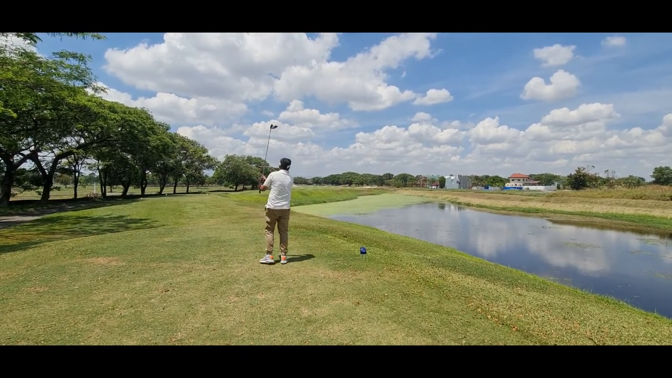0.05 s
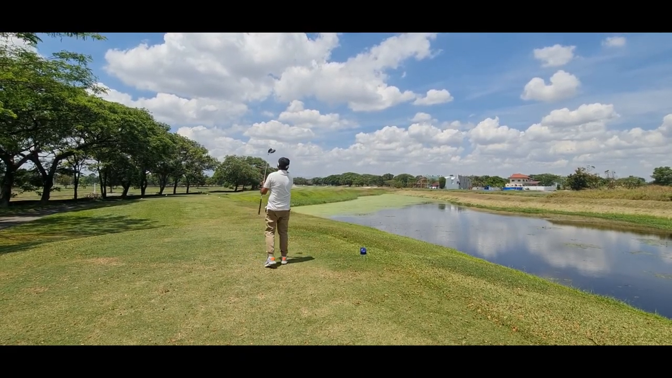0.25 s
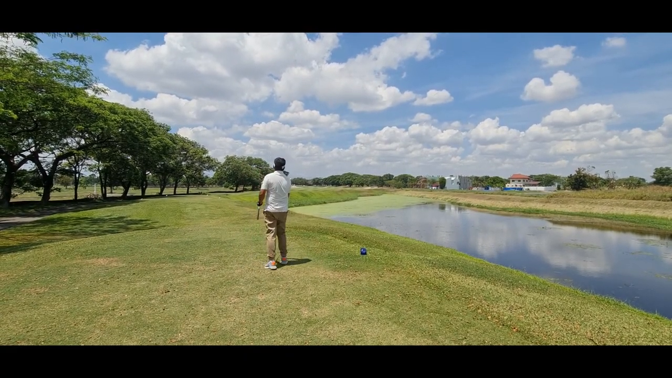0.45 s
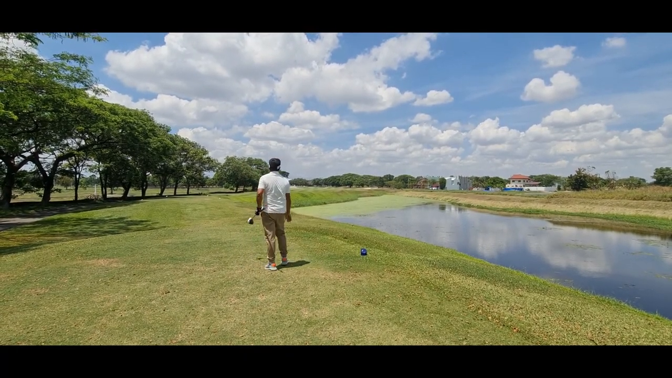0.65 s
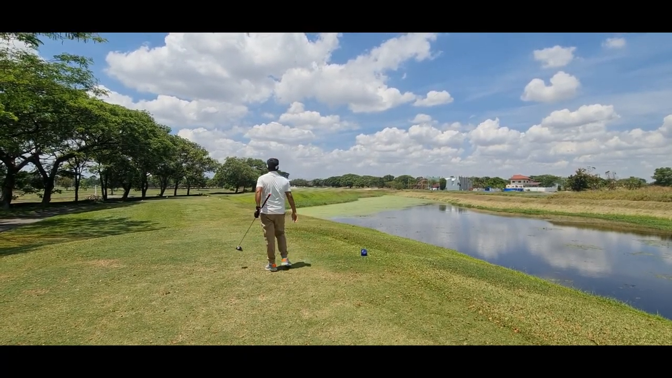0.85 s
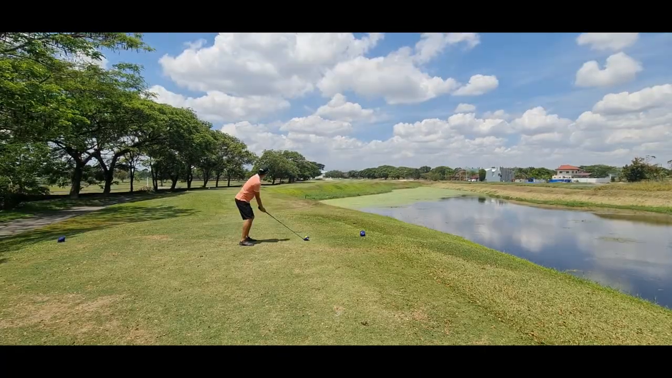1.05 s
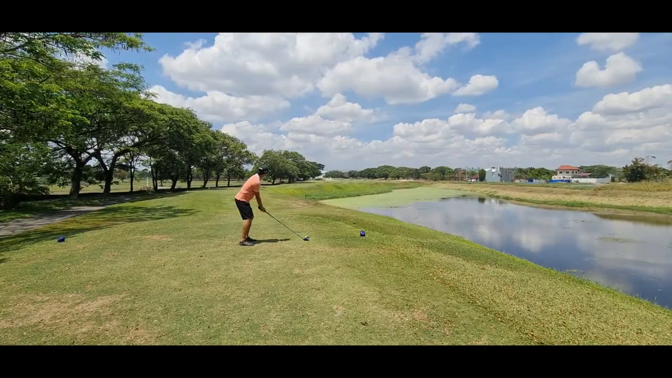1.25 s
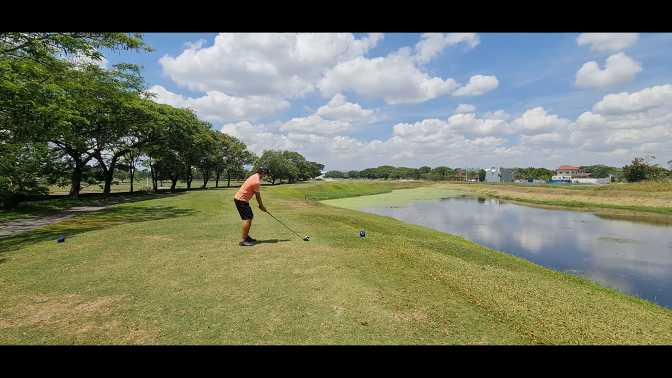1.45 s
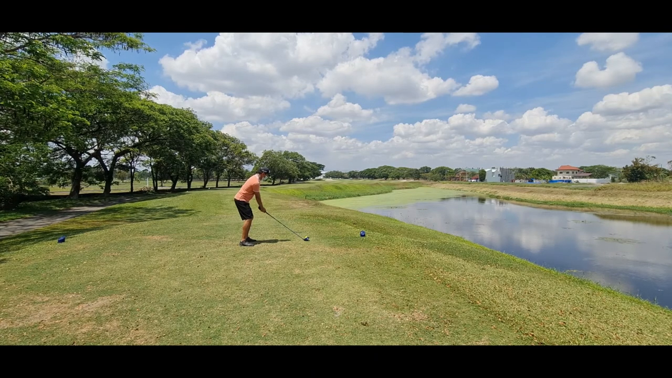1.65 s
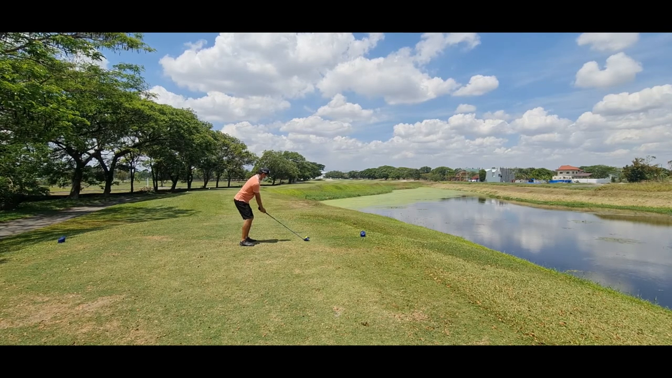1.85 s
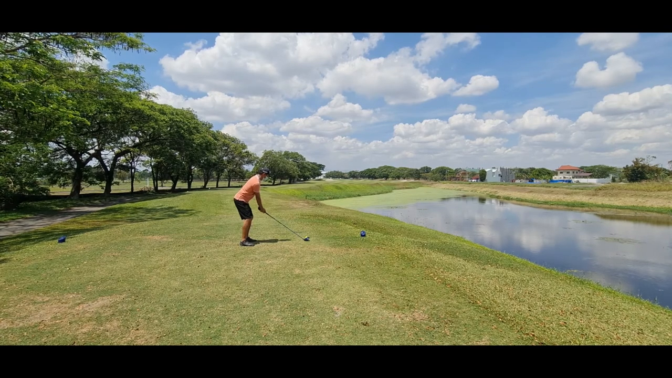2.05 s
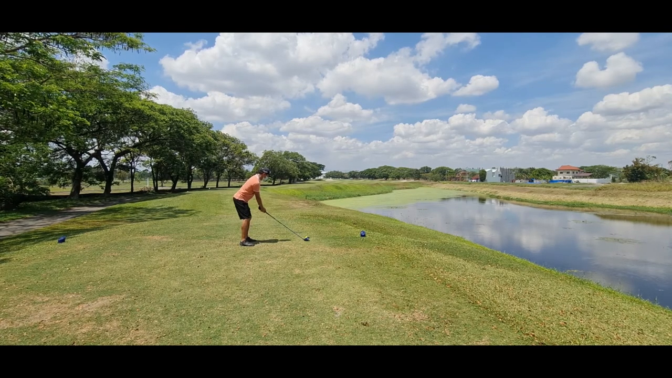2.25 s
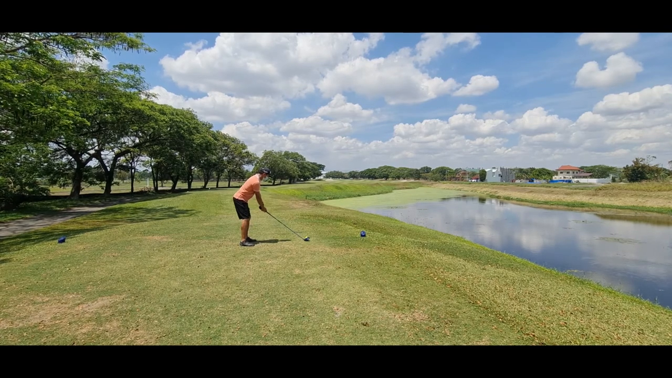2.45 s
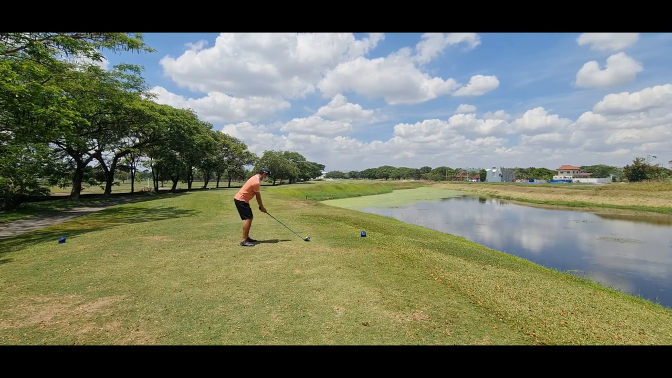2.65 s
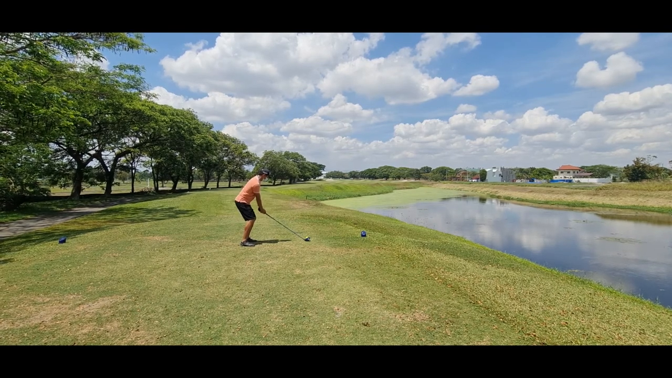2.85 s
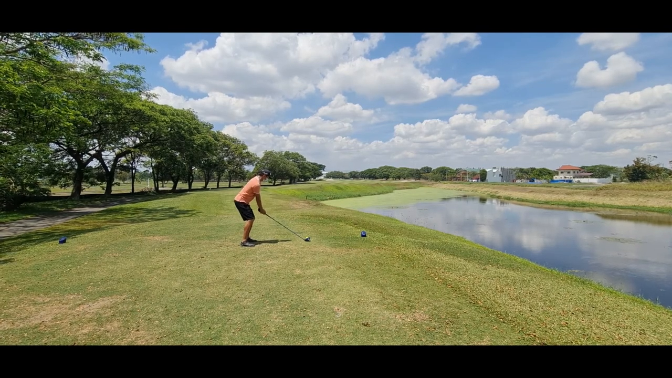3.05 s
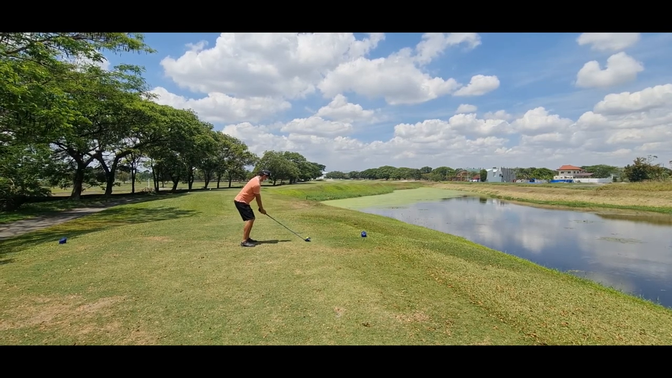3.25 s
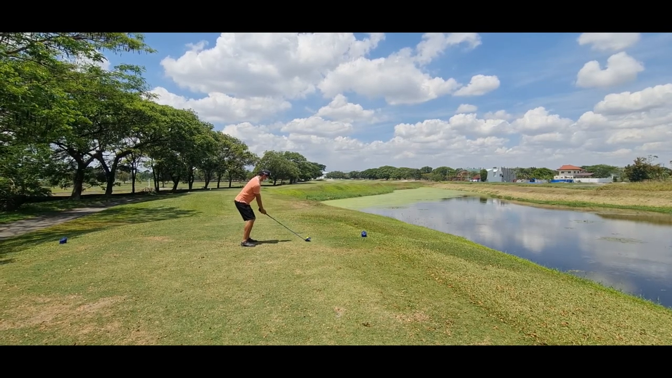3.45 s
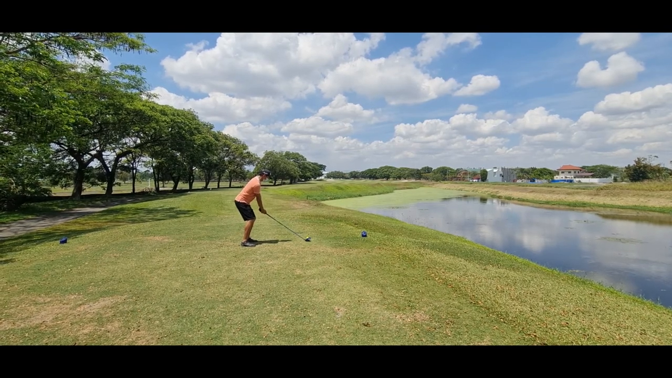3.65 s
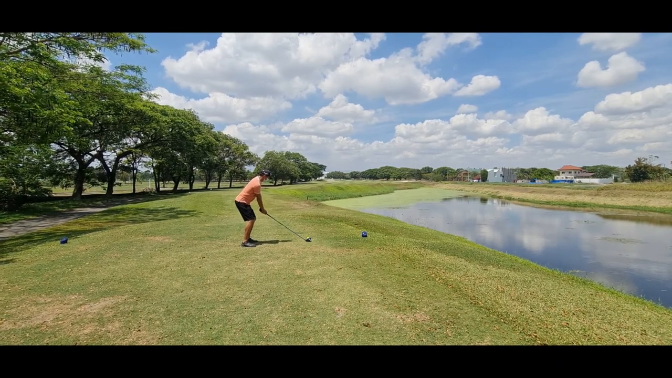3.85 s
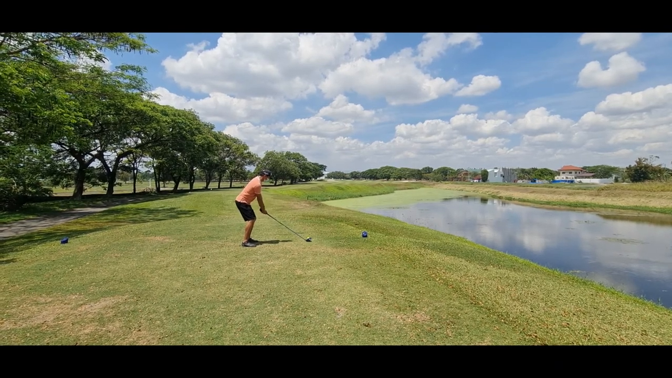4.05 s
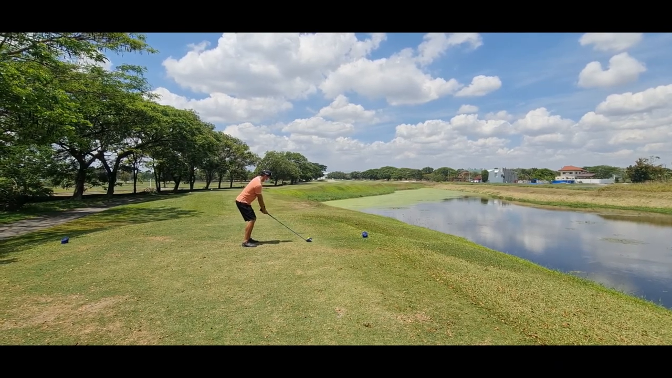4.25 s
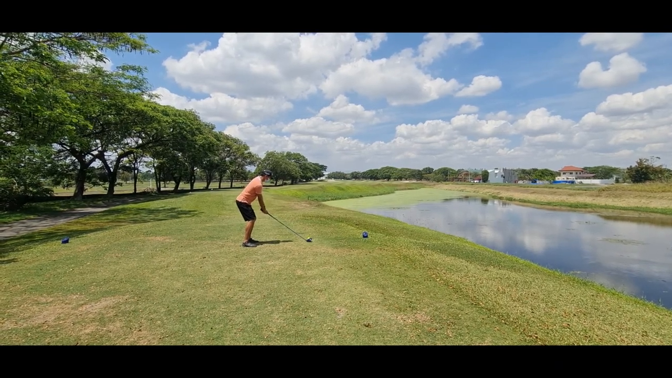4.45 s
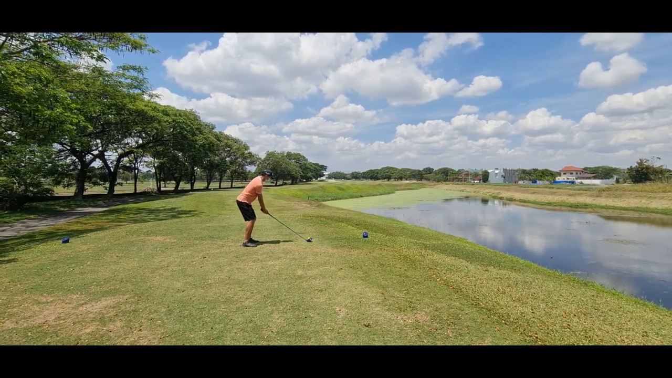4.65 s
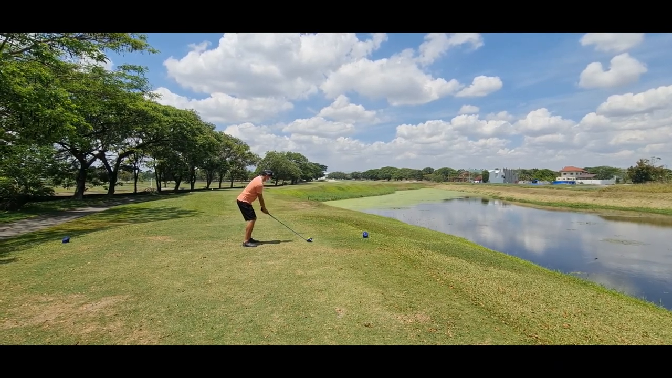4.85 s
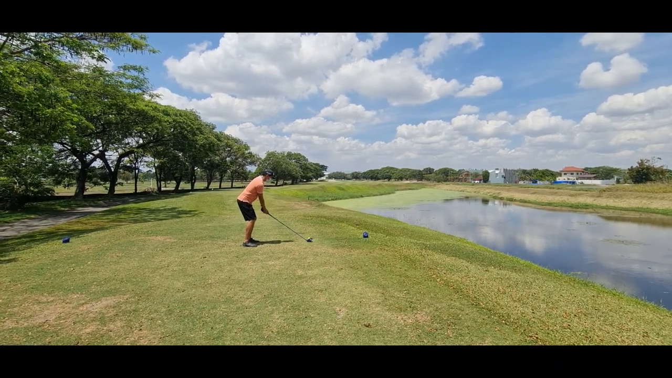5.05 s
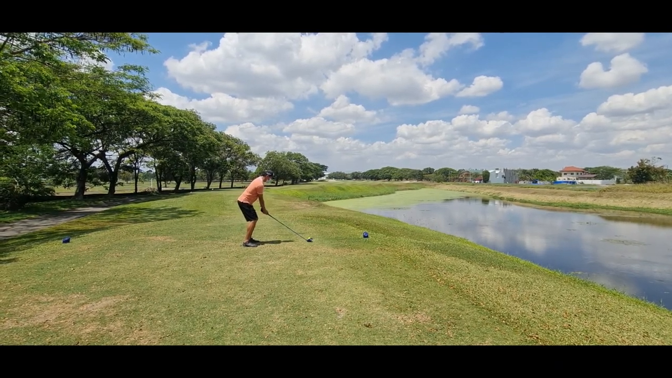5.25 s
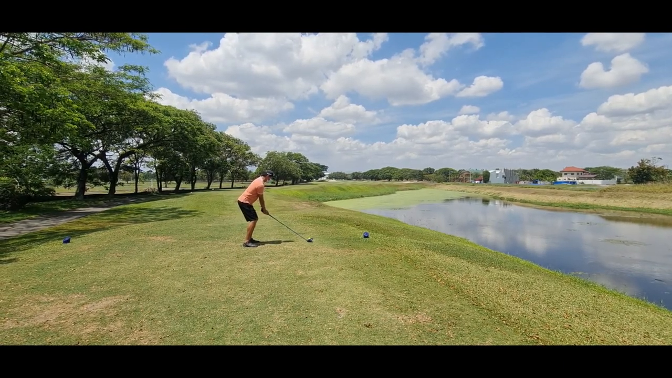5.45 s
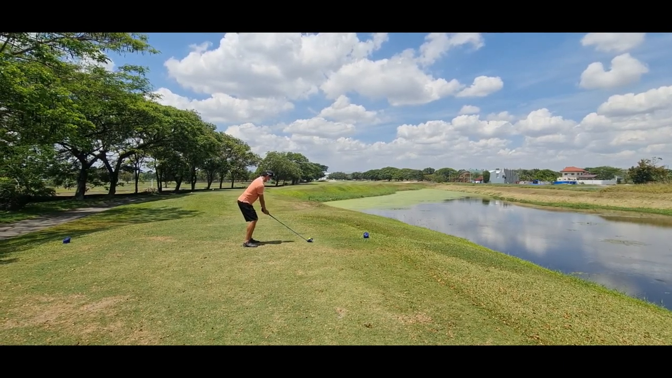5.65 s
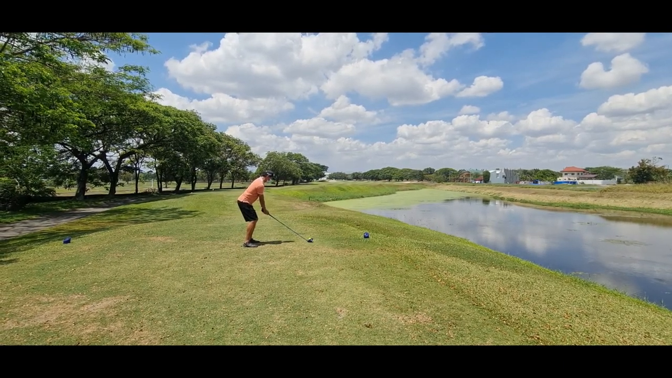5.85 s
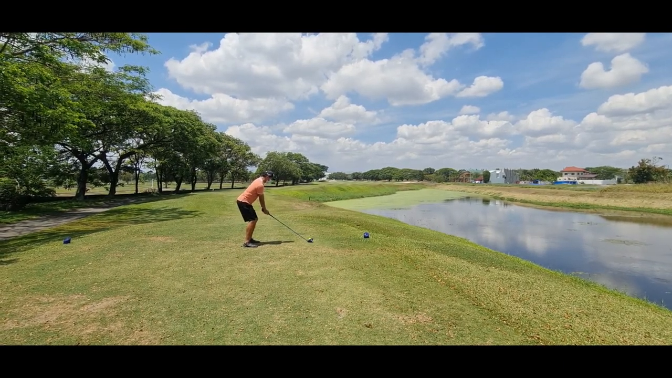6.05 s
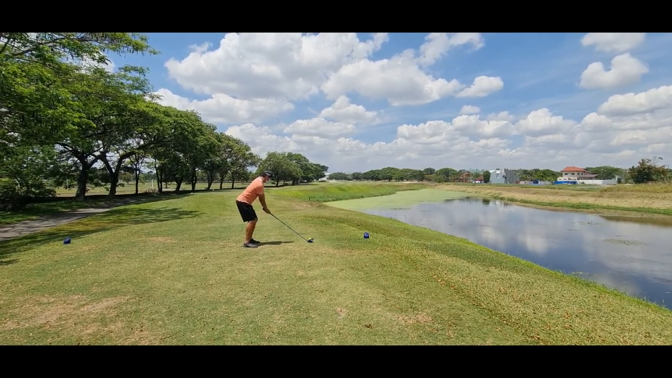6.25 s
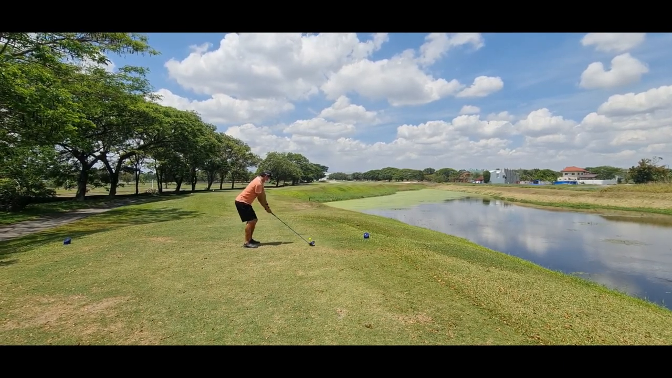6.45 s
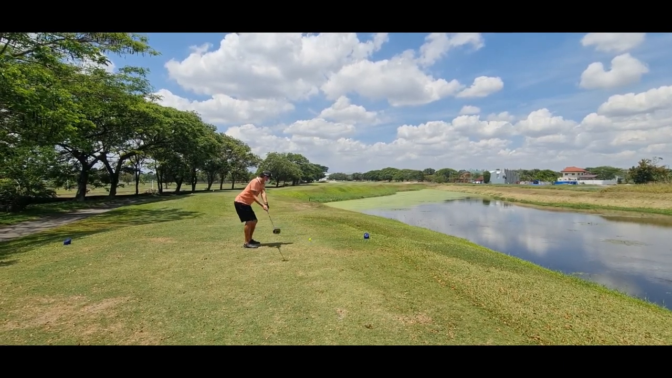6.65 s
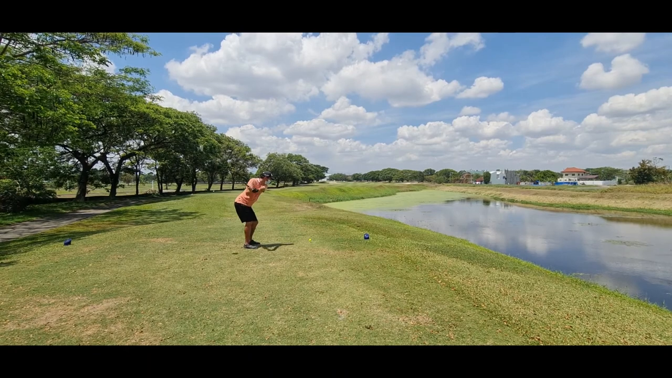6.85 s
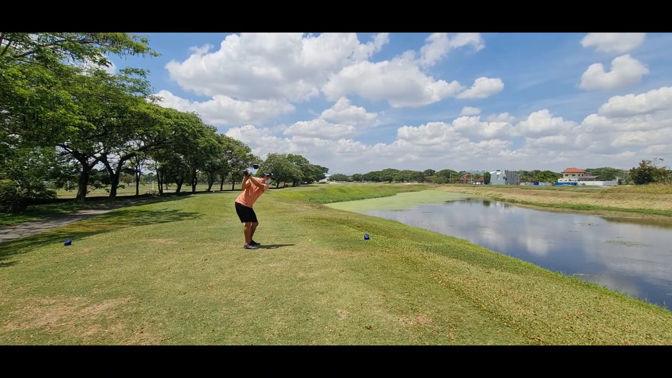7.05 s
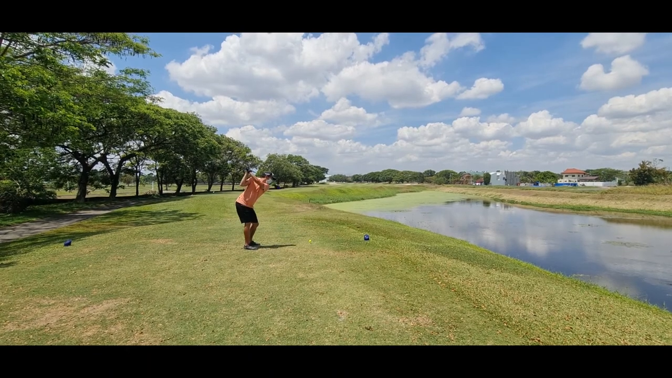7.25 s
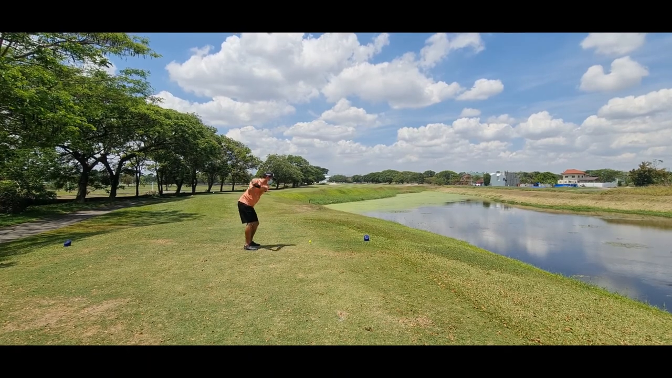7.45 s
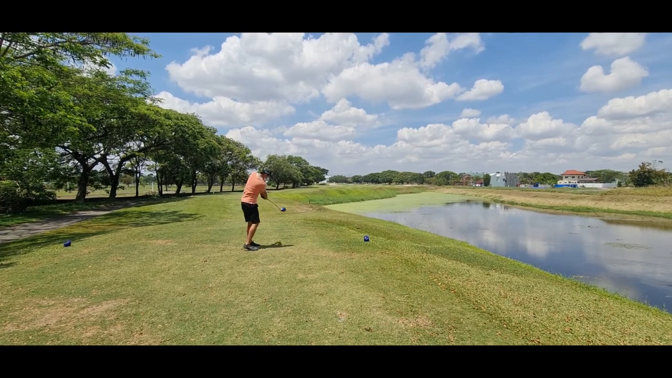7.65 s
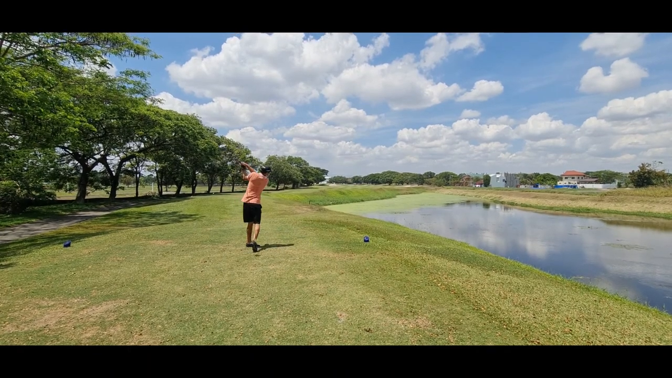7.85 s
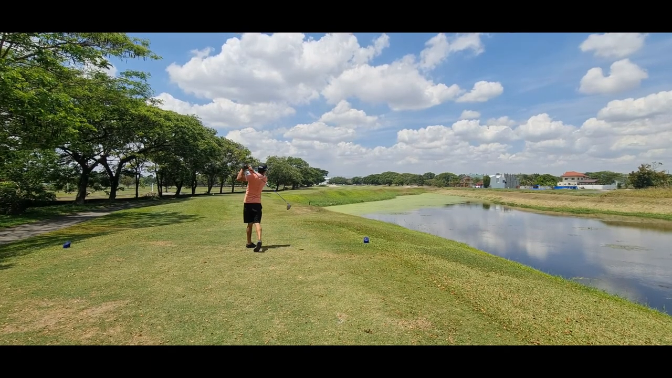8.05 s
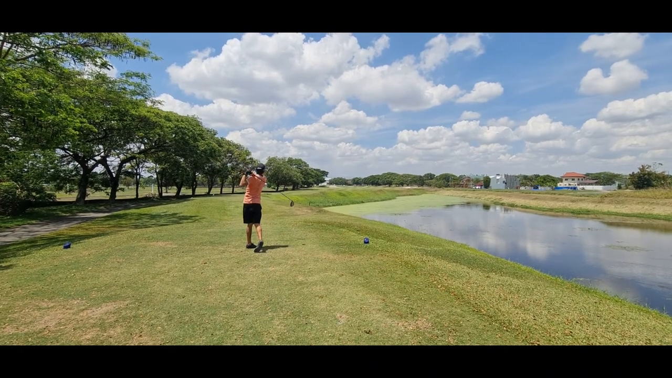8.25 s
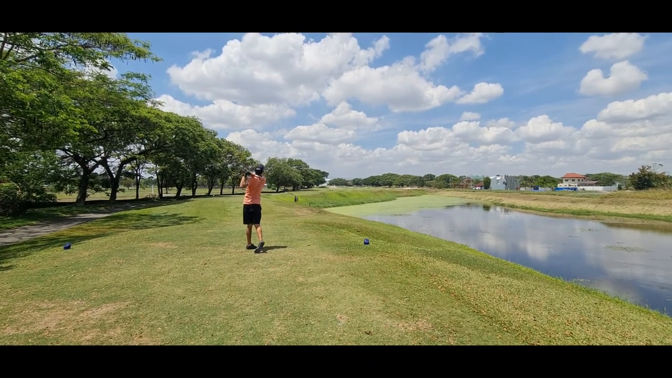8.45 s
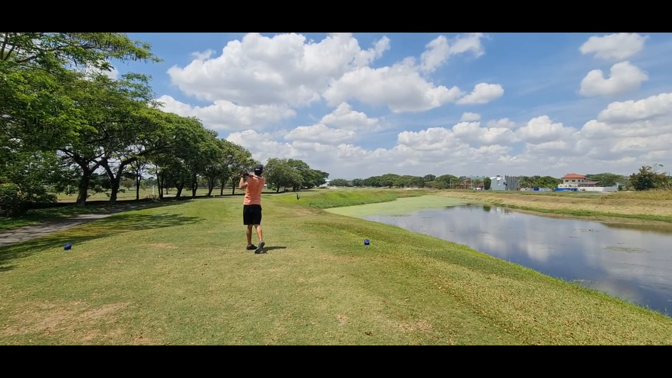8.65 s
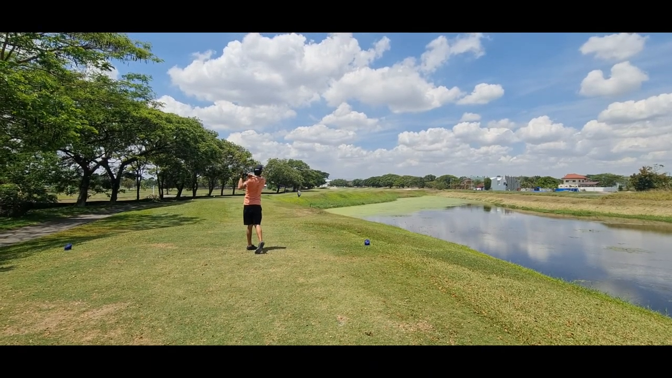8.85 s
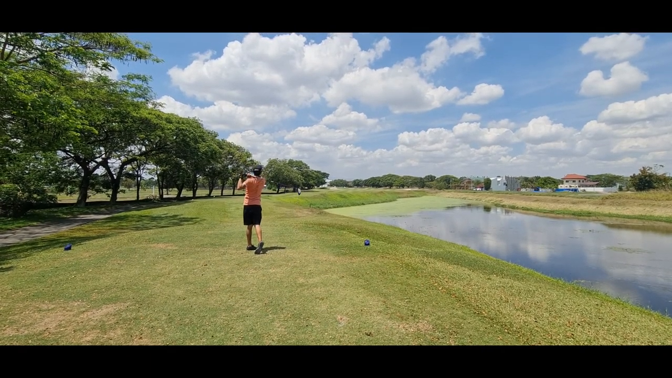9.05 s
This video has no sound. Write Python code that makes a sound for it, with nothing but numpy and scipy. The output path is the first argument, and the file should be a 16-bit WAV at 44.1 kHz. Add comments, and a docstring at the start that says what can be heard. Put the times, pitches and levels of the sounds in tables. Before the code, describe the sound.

Small birds chirp, warble and whistle faintly throughout on an open golf course, over a light breeze that rumbles on the microphone. In the first second, shoes softly brush the grass. At about 0.9 seconds all sound drops out for a tenth of a second. A dry tick sounds nearby at 1.3 seconds, with weaker ones near 1.9 and 2.5. From about 2 to 7 seconds the wind swells a little, with soft low thumps and pops. A distant bird adds thin, lower notes around 6 to 7 seconds. At 7.6 seconds a golf driver swishes down, and at 7.75 it hits the ball with a sharp crack and a short, high metallic ring, by far the loudest sound. The crack echoes off the trees for about half a second. Shoes brush the grass around 8.5 seconds, and a faint tick comes near 9 as birds and breeze continue.

```python
"""Small birds call over a light breeze that rumbles on two microphone ports; late on, a golf drive cracks.
Shoes brush the grass, a few dry ticks sound nearby, and all sound drops out briefly near 1 s.
The driver swishes down as air tears off its shaft, knocks the ball, and its hollow metal head rings.
The turf, a line of trees and single trunks and banks throw the crack back."""
import sys
import numpy as np
from scipy import signal
from scipy.fft import rfft, irfft, next_fast_len
from scipy.io import wavfile
from scipy.ndimage import uniform_filter1d, map_coordinates

SR = 44100
rng = np.random.default_rng(int(sys.argv[2]) if len(sys.argv) > 2 else 0)


def int16_out(signal):
    """Quantize to a 16-bit WAV file."""
    q = np.round(np.clip(np.atleast_2d(signal).T, -1, 1) * 32767)
    wavfile.write(sys.argv[1], SR, q.astype(np.int16))


N = 401310
TIME = np.arange(N) / SR
STRIKE_S = 7.754  # club meets ball

# spectrum thrown back by the surroundings: (frequency [Hz], relative density [dB])
ECHO_SPECTRUM = [(150, -7.5), (700, -3.5), (1400, -5), (2500, -5), (3100, -7), (3650, -10), (4000, -1.5),
                 (4350, 4), (5000, -5.5), (6200, 4), (7000, 1), (7700, -7), (10000, -10.5), (12000, -8.5),
                 (15500, -19)]
# spectrum of brushed grass and tick snaps: (frequency [Hz], relative density [dB])
GRASS_SPECTRUM = [(1500, -35), (3000, -6.5), (4500, 3), (5600, -5.5), (6500, -6), (8500, -21.5),
                  (15000, -32)]


def amp(db):
    """Decibels to gain."""
    return 10 ** (np.asarray(db) / 20)


def unit(x):
    """Scale to rms 1."""
    return x / np.sqrt(np.mean(x ** 2) + 1e-20)


def fade(t, t60_s):
    """Exponential decay, 60 dB in t60_s."""
    return np.exp(-np.log(1000) * t / t60_s)


def puff(u, attack_share):
    """Quick rise, slower fall over u = 0..1."""
    return np.minimum(u / attack_share, 1) * np.sqrt(1 - u)


def along(points, hz):
    """Interpolate (frequency [Hz], value) points on a log axis."""
    knots_hz, values = np.transpose(points)
    return np.interp(np.log(hz + 1), np.log(knots_hz + 1), values)


def curves(rows, t=TIME):
    """Interpolate each column after the time."""
    knots_s, *columns = np.transpose(rows)
    return [np.interp(t, knots_s, column) for column in columns]


def wobble(rate_hz, size=N):
    """Smooth random curve with knots at rate_hz."""
    knots = rng.standard_normal(int(size * rate_hz / SR) + 4)
    return map_coordinates(knots, [np.arange(size) * rate_hz / SR])


def filtered(x, response):
    """Apply a frequency response by padded FFT."""
    n = x.shape[-1]
    padded = next_fast_len(n + 8192)
    return irfft(rfft(x, padded) * response(np.fft.rfftfreq(padded, 1 / SR)), padded)[..., :n]


def stereo(mid, side, correlation):
    """Mix two independent noises to a given left-right correlation."""
    angle = np.arccos(np.clip(correlation, -1, 1)) / 2
    return np.cos(angle) * mid + np.sin(angle) * side * np.array([[1], [-1]])


def noise(spectrum, correlation, size=N):
    """Coloured stereo noise, rms 1."""
    mid, side = filtered(rng.standard_normal((2, size)), lambda hz: amp(along(spectrum, hz)))
    return unit(stereo(mid, side, correlation))


def pan(db):
    """Channel gains for a left-right level difference."""
    return amp(np.array([[db], [-db]]) / 2)


def pan_by_frequency(x, sides):
    """Pan by (frequency [Hz], left-right [dB]) points."""
    return filtered(x, lambda hz: amp(along(sides, hz) * np.array([[1], [-1]]) / 2))


def staggered(x, lead_ms):
    """The left port gets x lead_ms before the right."""
    return filtered(x, lambda hz: np.exp(1j * np.pi * hz * lead_ms / 1000 * np.array([[1], [-1]])))


def add(track, start_s, sound):
    """Mix a sound into a track."""
    start = max(round(start_s * SR), 0)
    track[..., start:start + sound.shape[-1]] += sound[..., :N - start]


def scattered(x, t60_s, correlation):
    """Diffuse return of x from many small surfaces."""
    t = np.arange(SR // 2) / SR
    mid, side = rng.standard_normal((2, len(t))) * fade(t, t60_s)
    tail = stereo(mid, side, correlation)
    tail /= np.linalg.norm(tail[0])
    return signal.fftconvolve(np.atleast_2d(x), tail, axes=1)[:, :x.shape[-1]]


def gusts(attack_s=0.0086, release_s=0.029):
    """Envelope of single gusts thumping each port."""
    # gusts: (time [s], hold [s], relative level [dB], left-right [dB])
    thumps = [(1.028, .025, -43, -1), (2.252, 0.083, -44, -15), (2.638, 0.062, -37, -8),
              (2.834, 0.058, -41, -14.5), (3.353, 0.055, -35.5, -11.5), (3.455, 0.1, -42, -17),
              (4.138, 0.08, -39.5, -15), (4.324, 0.03, -39.5, -15), (5.333, 0.075, -39.5, 13),
              (6.146, 0.042, -33, -9), (6.276, 0.043, -38, -4), (6.5, 0.032, -36.5, 5),
              (6.95, 0.035, -34, 0)]
    level = np.zeros((2, N))
    for s, hold_s, db, side_db in thumps:
        corners_s = [s - attack_s, s, s + hold_s, s + hold_s + release_s]
        level += amp(db) * pan(side_db) * np.interp(TIME, corners_s, [0, 1, 1, 0])
    return level


def wind(buffet_db=-2, gust_db=-4, breeze_db=-61.5, leaves_db=-71, eddy_hz=13, eddy_depth_db=3):
    """Wind buffets each port differently; its swell also lifts the breeze and the far leaves."""
    # slow swell: (time [s], strength [dB], left-right [dB])
    swell = [(0, -56.5, 0.5), (0.8, -53, -3.5), (1.1, -52.5, 1), (1.85, -49.5, 2.5), (2.3, -46, -10),
             (3.5, -46.5, -7), (3.9, -49, -6.5), (4.25, -45.5, -6.5), (4.6, -47, -5), (5.1, -43, -13.5),
             (5.4, -45, 3), (5.75, -50.5, -3), (6.15, -45, -12), (6.6, -44.5, -6), (7.6, -45.5, 1),
             (8.1, -52, -2.5), (8.55, -51, 3), (9.1, -46.5, 1.5)]
    # port rumble: (frequency [Hz], relative density [dB])
    buffet_spectrum = [(14, -20.5), (25, -6), (50, 0.5), (72, 4.5), (100, -5), (150, -19.5), (250, -23.5),
                       (400, -45.5), (800, -92)]
    # breeze: (frequency [Hz], relative density [dB])
    breeze_spectrum = [(70, -22.5), (130, 0.5), (190, -5.5), (260, -6.5), (400, -10.5), (630, -20.5),
                       (1100, -26), (2000, -47.5), (4000, -89)]
    # leaf rustle: (frequency [Hz], relative density [dB])
    leaf_spectrum = [(300, -12), (800, 3.5), (1100, -2.5), (1600, 0), (3000, -3.5), (5000, -7), (7400, -11),
                     (8000, -34.5), (10000, -26.5), (13000, -22), (15700, -25)]
    strength_db, veer_db = curves(swell)
    eddy_db = eddy_depth_db * np.array([wobble(eddy_hz), wobble(eddy_hz)])
    port_db = strength_db + np.array([veer_db, -veer_db]) / 2 + eddy_db
    push = np.hypot(amp(port_db + buffet_db), amp(gust_db) * gusts())
    buffet = push * noise(buffet_spectrum, 0.51)
    breeze_lift_db = 0.31 * (port_db - strength_db.mean())
    breeze = amp(breeze_db + breeze_lift_db + 1.2 * wobble(35)) * noise(breeze_spectrum, 0.39)
    leaf_lift_db = 0.08 * (strength_db - strength_db.mean())
    leaves = amp(leaves_db + leaf_lift_db + 0.48 * wobble(8.9)) * noise(leaf_spectrum, 0.066)
    return buffet + staggered(breeze + leaves, lead_ms=0.45)  # trees stand on the left


def turbulence(pop_t60_s=0.093, pop_rise_s=0.0014, side_db=-8):
    """Strong wind rushes past and small eddies pop, mostly on the right port."""
    # rush envelope: (time [s], level [dB])
    rush_levels = [(3.1, -92), (3.45, -71), (3.7, -71.5), (4.05, -74), (4.5, -82.5)]
    # rush: (frequency [Hz], relative density [dB])
    rush_spectrum = [(200, -20.5), (400, -0.5), (550, -2), (800, -7.5), (1200, -23.5), (3000, -49.5)]
    # eddy pops: (time [s], level [dB])
    pops = [(2.472, -50.5), (2.527, -55), (2.771, -52), (3.235, -51), (3.356, -50.5), (3.44, -51),
            (3.535, -50), (3.964, -49.5), (4.175, -56), (4.32, -52.5), (4.817, -58), (4.86, -51),
            (4.911, -51.5), (4.963, -50), (5.012, -51.5), (5.964, -50), (6.144, -48.5)]
    # one pop: (frequency [Hz], relative density [dB])
    pop_spectrum = [(60, -13), (150, 6), (380, 3.5), (700, -14.5), (1100, -27), (2500, -37), (6000, -58)]
    rush_db, = curves(rush_levels)
    out = amp(rush_db + wobble(30)) * noise(rush_spectrum, 0.12)
    t = np.arange(SR // 8) / SR
    envelope = (1 - np.exp(-t / pop_rise_s)) * fade(t, pop_t60_s)
    for s, db in pops:
        add(out, s, amp(db) * envelope * noise(pop_spectrum, 0.3, len(t)))
    return pan(side_db) * out


def syrinx(hz, level, waver, rasp_db=-40, flutter_db=3, rasp_ratio=1.24, rasp_waver=0.15):
    """Unsteady bird tone; the syrinx's other side adds a higher, rougher voice that dies first."""
    n = len(hz)
    phase = 2 * np.pi * np.cumsum(hz * (1 + waver * wobble(400, n))) / SR
    rasp_phase = 2 * np.pi * np.cumsum(hz * rasp_ratio * (1 + rasp_waver * wobble(250, n))) / SR
    rasp = amp(rasp_db) * np.linspace(2, 0, n) * np.sin(rasp_phase)
    flutter = unit(amp(flutter_db * wobble(150, n)))
    return level * flutter * (np.sin(phase) + rasp)


def arched_note(length_s, hz, droop, glide_oct, db, waver):
    """Bird note with drooping ends and a pitch glide."""
    u = np.linspace(-1, 1, int(length_s * SR))
    pitch_hz = hz * (1 - droop * u ** 2) * 2 ** (glide_oct * u / 2)
    return syrinx(pitch_hz, amp(db) * signal.windows.tukey(len(u), 0.4), waver)


def flock(count=48, typical_hz=3780, typical_s=0.036, typical_db=-73):
    """Faint raspy chirps at random moments."""
    out = np.zeros(N)
    for k, (jitter, pitch, length, level, slide) in enumerate(rng.standard_normal((count, 5))):
        chirp = arched_note(typical_s * np.exp(0.38 * length), typical_hz * np.exp(0.17 * pitch),
                            droop=0.12, glide_oct=0.32 * slide, db=typical_db + 2 * level, waver=0.03)
        add(out, ((k + jitter) % count) / count * TIME[-1], chirp)
    return out


def far_bird(sag_hz_per_s=100, wet_db=-4):
    """Long, nearly pure sagging notes linger among the trees."""
    # far notes: (time [s], length [s], starting pitch [Hz], level [dB])
    notes = [(5.847, .1, 1582, -69.5), (6.13, .11, 1790, -69), (6.241, 0.11, 1745, -70.5),
             (6.37, 0.05, 1745, -62.5), (6.522, 0.18, 1736, -72.5), (6.759, 0.23, 1592, -69.5),
             (6.98, 0.13, 1557, -72)]
    out = np.zeros(N)
    for s, length_s, hz, db in notes:
        t = np.arange(int(length_s * SR)) / SR
        envelope = amp(db) * signal.windows.tukey(len(t), 0.4)
        add(out, s, syrinx(hz - sag_hz_per_s * t, envelope, waver=0.011, flutter_db=5))
    return out + amp(wet_db) * scattered(out, t60_s=0.45, correlation=0.3)


def whistles(pure_waver=0.012, arch_waver=0.11):
    """Nearer birds' single notes, rougher the more they arch."""
    # whistles: (time [s], length [s], mid pitch [Hz], end droop [0-1], glide [octaves], level [dB])
    notes = [(0.132, .13, 3310, 0.08, -0.097, -66), (0.205, .03, 3730, 0.2, 0, -65),
             (0.302, 0.036, 2870, 0, -0.038, -64), (0.433, 0.077, 4340, 0.07, -0.23, -68),
             (0.493, 0.038, 4260, .05, .05, -68), (1.019, 0.021, 2450, 0.16, 0.23, -64),
             (1.249, 0.067, 2590, 0.25, 0.18, -61.5), (1.316, 0.01, 6200, 0.16, 0.063, -60.5),
             (1.518, 0.037, 6780, 0.3, -0.021, -62), (2.371, 0.056, 4200, 0, 0.33, -66.5),
             (2.495, 0.054, 4580, 0, -0.018, -62.5), (3.822, 0.027, 1390, 0.01, 0.47, -61),
             (3.905, 0.045, 1400, 0.03, -.45, -65), (4.098, 0.086, 1975, 0.04, -.01, -65),
             (4.189, 0.051, 1940, 0.02, 0.067, -60), (4.693, 0.063, 2366, 0.1, -0.078, -65.5),
             (4.942, 0.027, 3290, 0, -0.07, -62), (4.974, .028, 2990, 0, 0.0014, -69),
             (5.024, .035, 2040, 0, -0.013, -64), (5.051, 0.051, 2195, 0.16, -0.00096, -61),
             (5.03, 0.023, 5550, 0, .2, -73), (5.075, .018, 5300, 0, .35, -69),
             (5.106, .025, 6000, .03, -.15, -70), (5.172, 0.011, 5600, 0, .35, -61),
             (5.645, 0.077, 4580, 0.14, 0.01, -69.5), (6.044, 0.029, 3270, 0.1, -0.41, -64.5),
             (6.127, 0.039, 2980, 0.09, 0.025, -59), (6.53, 0.033, 3400, 0.02, -.2, -64.5),
             (6.898, 0.054, 2930, 0.35, -0.016, -58.5), (7.414, 0.039, 2290, 0.06, -0.12, -65.5),
             (9.033, 0.023, 3580, 0.1, 0.32, -63.5), (9.052, 0.025, 1290, 0.03, 0.35, -57.5)]
    out = np.zeros(N)
    for s, length_s, hz, droop, glide_oct, db in notes:
        add(out, s, arched_note(length_s, hz, droop, glide_oct, db, pure_waver + arch_waver * droop))
    return out


def songs():
    """Three set bird calls, each repeat with its own pitch and rasp."""
    # warble contour: (time [s], pitch [Hz], relative level [dB])
    warble = [(0, 3890, -15.5), (.014, 4450, -6.5), (.024, 3990, -7), (.032, 3480, -2.5), (.048, 3400, -2),
              (.057, 2980, -6.5), (.071, 3160, -3), (.084, 3902, 7.5), (.092, 3614, 0.5), (.102, 3100, -14)]
    # high falling call contour: (time [s], pitch [Hz], relative level [dB])
    tseer = [(0, 6780, -17), (.009, 7500, -5), (.017, 6760, -5.5), (.032, 7020, 0), (.055, 5950, 0),
             (.085, 5240, -12), (.125, 4637, -15.5), (.145, 4394, -24.5)]
    # short rising call contour: (time [s], pitch [Hz], relative level [dB])
    chip = [(0, 2510, -18), (.006, 3360, 0), (.013, 4050, 11), (.02, 4210, 6), (.028, 4000, -17),
            (.036, 3500, -20)]
    # repeats of each call: (time [s], level [dB], pitch [ratio], rasp [dB])
    warbles = [(.042, -60, 0.95, -21.5), (.771, -63.5, 0.93, -4), (1.066, -58, 1.02, -10),
               (1.706, -59, 1.01, -2.5), (2.479, -55, 1.014, -7), (3.313, -57, 1.036, -7),
               (4.045, -58.5, 0.97, -5.5), (4.762, -58, 1.02, -10.5), (5.472, -59.5, 1, -10),
               (6.761, -57.5, 1.01, -7), (7.451, -55, 1.01, -9), (8.234, -58, 1.01, -9),
               (8.823, -58, 1.01, -5)]
    tseers = [(0, -62, 0.98, -29), (1.466, -67, 1.06, -29.5), (1.728, -59, 0.98, -30),
              (2.958, -61, 1.04, -32.5), (4.315, -62, 1.01, -35), (6.04, -65, 0.99, -33),
              (7.567, -62.5, 1.02, -33)]
    chips = [(.313, -73, 1.36, -21), (1.187, -56.5, 0.86, -10), (1.32, -60, 0.92, -31),
             (1.458, -65.5, 0.98, -16), (4.911, -61, 1, -18), (5.172, -58, 0.97, -24),
             (6.369, -51.5, 1.01, -17)]
    out = np.zeros(N)
    for contour, calls, waver in (warble, warbles, 0.035), (tseer, tseers, 0.012), (chip, chips, 0.027):
        t = np.arange(int(contour[-1][0] * SR)) / SR
        hz, contour_db = curves(contour, t)
        for s, db, ratio, rasp_db in calls:
            add(out, s, syrinx(hz * ratio, amp(db + contour_db), waver, rasp_db))
    return out


def scolds(chord_db=-3, breath_db=-7.5, sag=0.042):
    """Hoarse bird notes: sagging tones and a rasp of air, stuttering as they fade."""
    # scolding notes: (time [s], length [s], level [dB], pitch [ratio])
    notes = [(3.243, .058, -54.5, .985), (4.193, 0.022, -60.5, .99), (7.16, 0.051, -52, 1),
             (7.219, 0.039, -56.5, 1.07)]
    # simultaneous tones: (frequency [Hz], relative level [dB])
    tones = [(2000, -3), (2690, 1.5), (2830, -5), (3950, -19), (5050, -17), (5460, -15), (7250, -19)]
    # air in the throat: (frequency [Hz], relative density [dB])
    throat_spectrum = [(1500, -36), (1850, -18), (2050, -10), (2300, -16), (2700, -9), (3200, -13),
                       (4200, -15), (5100, -21), (7000, -25), (8500, -60)]
    out = np.zeros((2, N))
    for s, length_s, db, ratio in notes:
        u = np.linspace(0, 1, int(length_s * SR))
        bend = ratio * (1 - sag * (u - 0.5))
        chord = sum(syrinx(hz * bend, amp(tone_db), waver=0.014, flutter_db=4) for hz, tone_db in tones)
        stutter = unit(amp(4 * wobble(170, len(u))))
        voice = amp(chord_db) * unit(chord) + amp(breath_db) * noise(throat_spectrum, 0.51, len(u))
        add(out, s, amp(db) * puff(u, attack_share=0.043) * stutter * voice)
    return out


def birds(direct_db=-1.6, twigs_db=-8, crowns_db=-6, side_db=-1):
    """Bird calls, blurred by nearby twigs and echoed by the crowns."""
    voices = songs() + whistles() + flock() + scolds()
    twigs = amp(twigs_db) * scattered(voices, t60_s=0.05, correlation=0.8)
    calls = amp(direct_db) * voices + twigs + far_bird()
    crowns = amp(crowns_db) * scattered(voices, t60_s=0.23, correlation=0.1)
    return pan(side_db) * (staggered(calls, lead_ms=0.4) + crowns)


def shoes(flutter_db=2.7):
    """Shoes brush the grass in short puffs of noise."""
    # brushes: (time [s], length [s], level [dB])
    brushes = [(.31, 0.071, -66.5), (.42, 0.045, -66.5), (.57, .044, -71), (.78, .12, -65.5),
               (8.41, 0.085, -63.5), (8.535, .04, -64.5), (8.66, .03, -71)]
    level = np.zeros(N)
    for s, length_s, db in brushes:
        u = np.linspace(0, 1, int(length_s * SR))
        add(level, s, amp(db) * puff(u, attack_share=0.29))
    return level * noise(GRASS_SPECTRUM, 0.2) * amp(flutter_db * wobble(250))


def ticks(snap_db=-7, t60_s=0.009):
    """Dry ticks: a damped tone plus a snap of noise."""
    # ticks: (time [s], level [dB], pitch [Hz])
    events = [(1.2754, -40, 3280), (1.922, -54, 5800), (2.53, -53, 1150), (8.96, -55, 2000)]
    out = np.zeros((2, N))
    t = np.arange(SR // 20) / SR
    for s, db, hz in events:
        snap = amp(snap_db) * noise(GRASS_SPECTRUM, 0.64, len(t))
        add(out, s, amp(db) * fade(t, t60_s) * (np.sin(2 * np.pi * hz * t) + snap))
    return staggered(out, lead_ms=0)


def patchy(x, depth_db):
    """Random swells, each about 1 kHz wide and 10 ms long."""
    bins = signal.stft(x, SR, nperseg=256)[2]
    field = uniform_filter1d(rng.standard_normal(bins.shape[1:]), size=7, axis=0)
    field = uniform_filter1d(field, size=5, axis=1)
    gain = unit(amp(depth_db * unit(field)))
    return signal.istft(bins * gain, SR, nperseg=256)[1][:, :x.shape[-1]]


def air_decay(x):
    """Each frequency dies at its own rate, the top treble fastest."""
    # decay in air: (frequency [Hz], t60 [s])
    decay_times = [(200, 0.87), (2000, 0.72), (4300, 0.67), (6500, 0.72), (9000, 0.58), (15000, 0.39)]
    hz, t, bins = signal.stft(x, SR, nperseg=256)
    gain = fade(t, along(decay_times, hz)[:, None])
    return signal.istft(bins * gain, SR, nperseg=256)[1][:, :x.shape[-1]]


def echoes(turf_db=-35, turf_t60_s=0.31, trees_db=-41.5, trees_delay_s=0.049, trees_rise_s=0.0077):
    """The turf scatters the crack at once; the trees answer later and longer."""
    # echo balance: (frequency [Hz], left-right [dB])
    sides = [(60, -2), (180, 1), (550, 1), (1650, 0), (4970, -0.5), (15000, 4)]
    t = np.arange(SR) / SR
    out = np.zeros((2, N))
    add(out, STRIKE_S, amp(turf_db) * noise(ECHO_SPECTRUM, 0.72, len(t)) * fade(t, turf_t60_s))
    trees = air_decay(patchy(noise(ECHO_SPECTRUM, 0.2, len(t)), depth_db=2.2))
    add(out, STRIKE_S + trees_delay_s, amp(trees_db) * (1 - np.exp(-t / trees_rise_s)) * trees)
    return pan_by_frequency(out, sides)


def trunk_returns(rise_s=0.0022):
    """Single trunks and banks each throw back one band of the crack."""
    # returns: (delay [s], level [dB], centre [Hz], width [octaves], t60 [s])
    returns = [(0.047, -31, 6100, 0.12, 0.034), (.051, -41.5, 399.3, 0.5, .05), (.064, -50, 900, .6, .09),
               (.062, -48, 2220, 0.37, 0.14), (.078, -55, 4500, 0.061, 0.066), (.143, -58, 1100, 1, 0.13),
               (.153, -51, 6300, .2, .07), (.169, -53, 5900, .3, .06), (.195, -62.5, 1200, .8, .14),
               (.224, -57, 2300, .4, 0.036), (0.261, -65, 5600, 0.43, 0.2), (.293, -63.5, 1200, 1, .14),
               (.322, -61, 4580, .3, 0.15)]
    out = np.zeros((2, N))
    t = np.arange(SR // 3) / SR
    for delay_s, db, centre_hz, width_oct, t60_s in returns:
        band = lambda hz: np.exp(-(np.log2((hz + 1) / centre_hz) / width_oct) ** 2 / 2)
        scatter = unit(filtered(noise(ECHO_SPECTRUM, 0.35, len(t)), band))
        add(out, STRIKE_S + delay_s, amp(db) * scatter * (1 - np.exp(-t / rise_s)) * fade(t, t60_s))
    return out


def swing():
    """Air tears off shaft and head, loudest where the club is fastest."""
    # downswing envelope: (time [s], level [dB])
    swish_levels = [(7.55, -75.5), (7.64, -62), (7.69, -57), (7.725, -47.5), (7.75, -44.5), (7.79, -58),
                    (7.86, -77.5)]
    # swish: (frequency [Hz], relative density [dB])
    swish_spectrum = [(100, -11), (350, -4.5), (700, 0), (1300, -10.5), (1900, -13.5), (2800, -21),
                      (6000, -16.5), (8000, -30), (15000, -41)]
    swish_db, = curves(swish_levels)
    return amp(swish_db) * noise(swish_spectrum, 0.095)


def head_ring(t, doppler_rise=0.064, doppler_s=0.06, max_sway=0.27, sway_s=0.025, grass_db=-13):
    """The head's modes waver more as it sweeps away over the turf; the grass roughens them."""
    # face and crown modes: (frequency [Hz], relative level [dB], t60 [s], left-right [dB])
    modes = [(3860, -21, .095, -1.5), (4130, -14.5, 0.14, -4.5), (4258, -27.5, .085, -2.5),
             (4368, -25, .09, -10), (4556, -36, 0.091, -6), (5250, -31.5, .04, -7.5),
             (5370, -30.5, .05, -4), (5790, -14, .054, -3.5), (5900, -27.5, .05, -2.5),
             (6235, -25, .055, -5.5), (6480, -27.5, .08, -4), (7650, -23, .025, 8.5),
             (7875, -30.5, .06, 8.5), (8300, -37.5, .05, 4), (11300, -38, .05, 0), (11720, -35, .05, 4),
             (14920, -42, .04, 9.5)]
    # Doppler: the head flies away, then curves upward, so the pitch rises
    heard_s = np.cumsum(1 + doppler_rise * (1 - np.exp(-(t / doppler_s) ** 2))) / SR
    sway = max_sway * (1 - np.exp(-heard_s / sway_s))
    ring = np.zeros((2, len(t)))
    for k, (hz, db, t60_s, side_db) in enumerate(modes):
        phase = 2 * np.pi * hz * heard_s + sway * wobble(350, len(t))
        envelope = np.exp(sway * wobble(250, len(t))) * fade(heard_s, t60_s)
        ring += (-1) ** k * amp(db) * pan(side_db) * envelope * np.sin(phase)
    return ring + amp(grass_db) * scattered(ring, t60_s=0.09, correlation=0.8)


def knock(t, thud_hz=375, thud_db=-21.5, thud_t60_s=0.022):
    """The squashed ball's low thud and the dull knock of ball and club shell."""
    # ball and shell modes: (frequency [Hz], level [dB], t60 [s], left-right [dB])
    modes = [(844, -9.5, .0115, 2), (1705, -5, 0.0073, -0.5), (2680, -11.5, .004, 1)]
    thud = amp(thud_db) * np.sin(2 * np.pi * thud_hz * t) * fade(t, thud_t60_s)
    return thud + sum((-1) ** k * amp(db) * pan(side_db) * np.sin(2 * np.pi * hz * t) * fade(t, t60_s)
                      for k, (hz, db, t60_s, side_db) in enumerate(modes))


def strike(ring_db=1, crack_db=-21, crack_t60_s=0.058, contact_rise_s=0.00024):
    """Half a millisecond of contact knocks the ball and sets the club head ringing."""
    # crowded fast modes of the head: (frequency [Hz], relative density [dB])
    crack_spectrum = [(120, -8.5), (260, -6), (480, -14), (640, -4), (900, -7.5), (2000, -7), (3200, -13),
                      (4600, -6.5), (5300, -1), (6000, -1), (6800, -6.5), (7550, 1), (8500, -8.5),
                      (12000, -14), (14800, -17.5), (15600, -30)]
    # crack balance: (frequency [Hz], left-right [dB])
    crack_sides = [(1000, 1.5), (4500, -2.5), (6500, -3), (8000, 2.5), (12000, 4), (15000, 7)]
    t = np.arange(SR // 2) / SR
    ring = amp(ring_db) * head_ring(t)
    crack = pan_by_frequency(noise(crack_spectrum, 0.62, len(t)), crack_sides)
    crack *= amp(crack_db) * fade(t, crack_t60_s)
    build_up = 1 - np.exp(-(t / contact_rise_s) ** 2)  # while the ball is squashed on the face
    out = np.zeros((2, N))
    add(out, STRIKE_S, knock(t) + (ring + crack) * build_up)
    return staggered(out, lead_ms=0.052)  # golfer slightly left


def scene():
    """The tee shot among birds and wind."""
    shot = swing() + strike() + echoes() + trunk_returns()
    calls = birds()
    nearby = staggered(shoes() + ticks(), lead_ms=-0.396)  # off to the right
    return shot + calls + nearby + wind() + turbulence()


def record(dry, ceiling=0.92, top_hz=15750):
    """Soft peak limit, a 0.1 s dropout and a hard band limit."""
    # dropout: (time [s], gain [dB])
    dropout = [(.905, 3), (.917, -40), (.96, -67), (.995, -49), (1.008, 0)]
    dropout_db, = curves(dropout)
    limited = dry / (1 + np.abs(dry / ceiling) ** 8) ** (1 / 8)
    return filtered(limited * amp(dropout_db), lambda hz: hz < top_hz)


dry = scene()
out = record(dry)
int16_out(out)
```